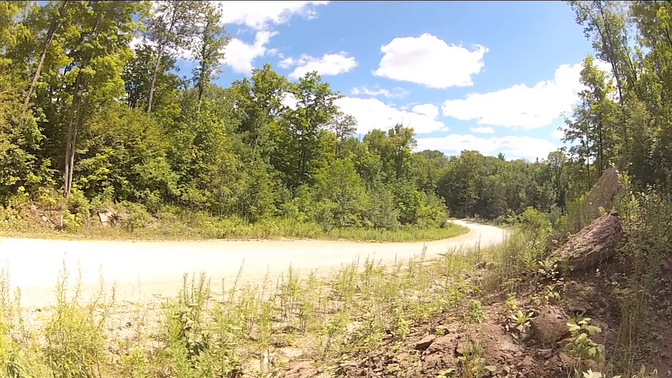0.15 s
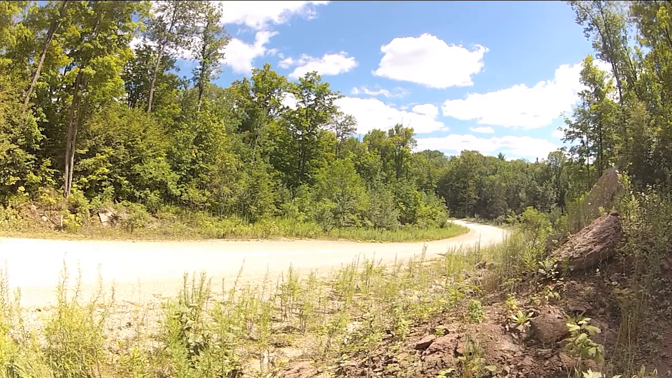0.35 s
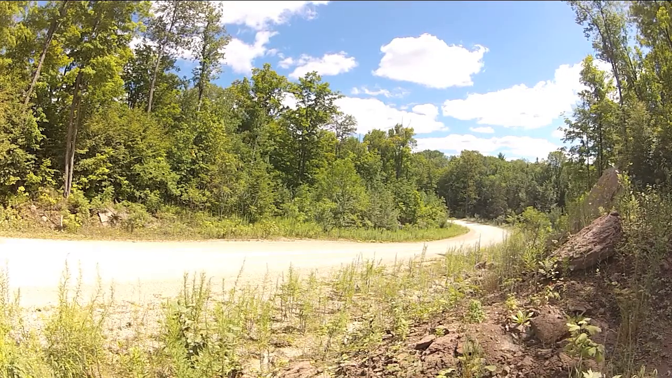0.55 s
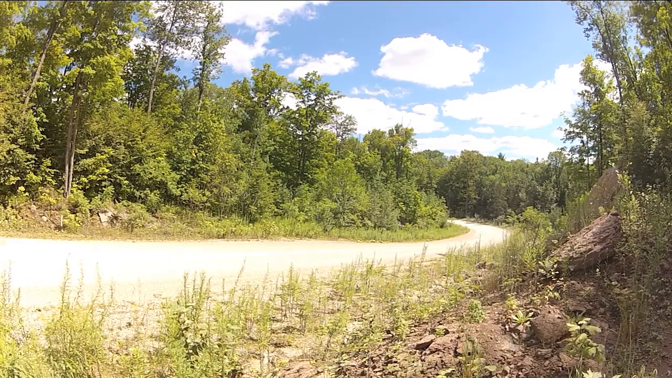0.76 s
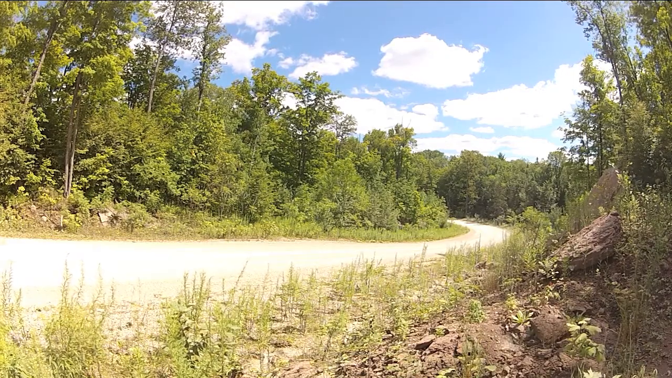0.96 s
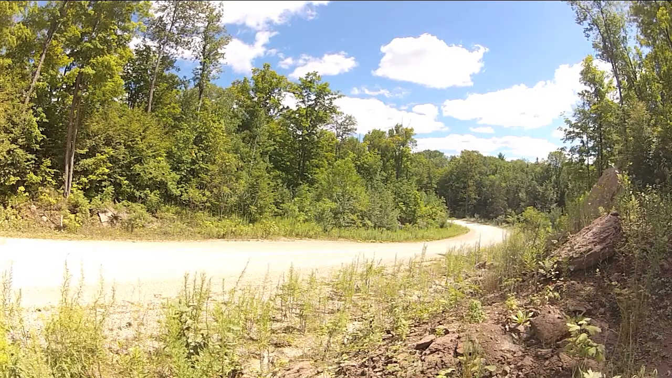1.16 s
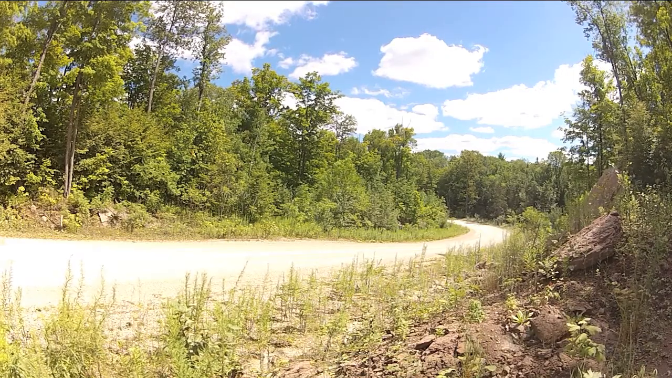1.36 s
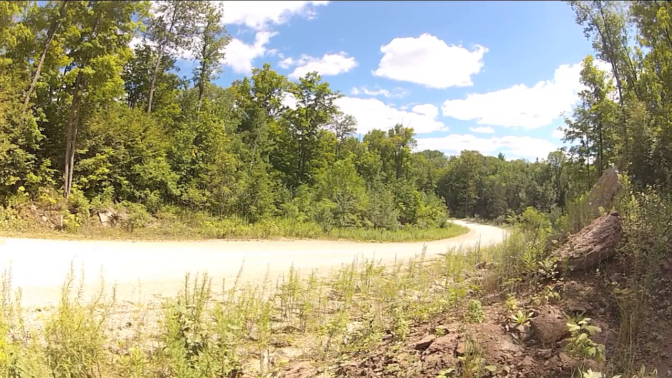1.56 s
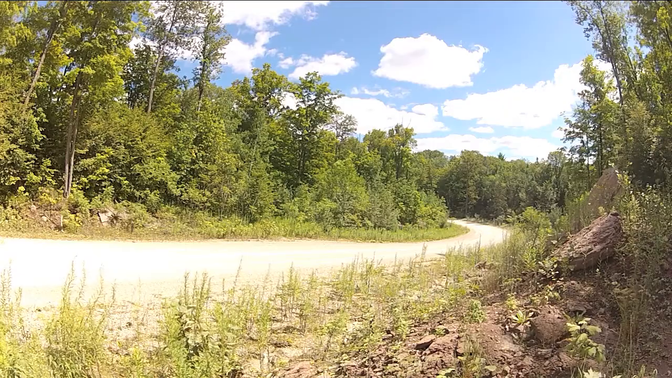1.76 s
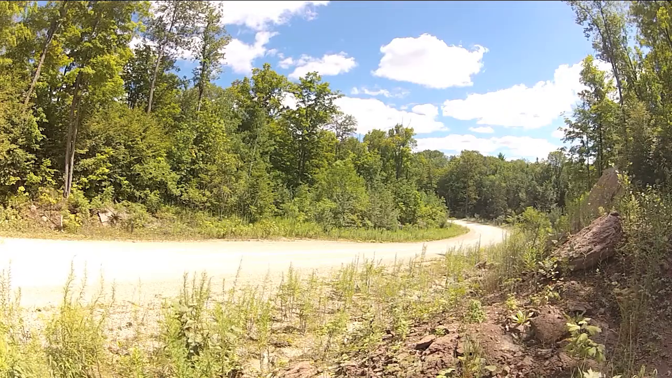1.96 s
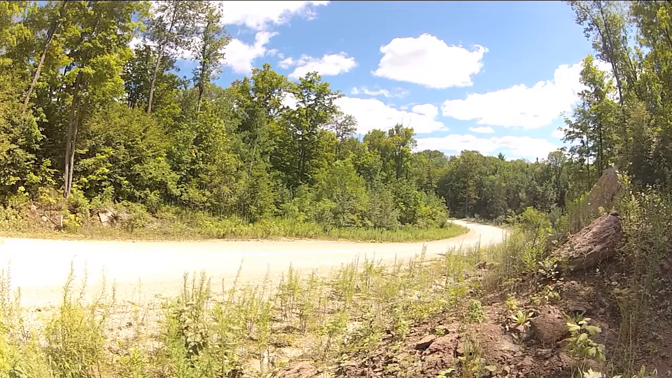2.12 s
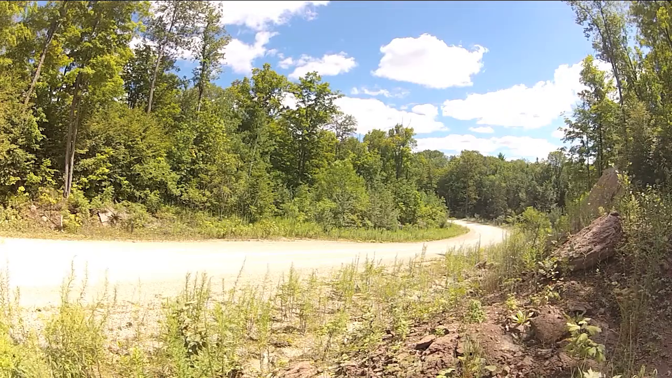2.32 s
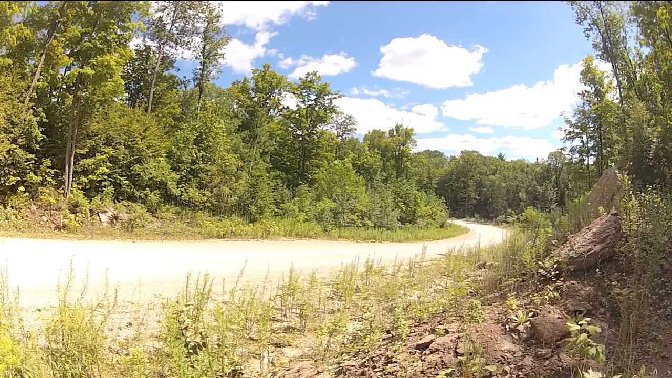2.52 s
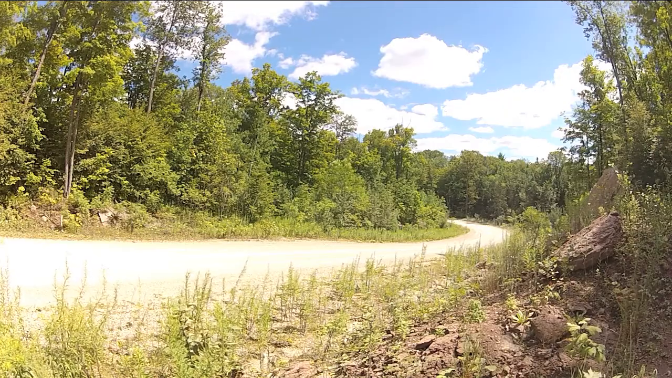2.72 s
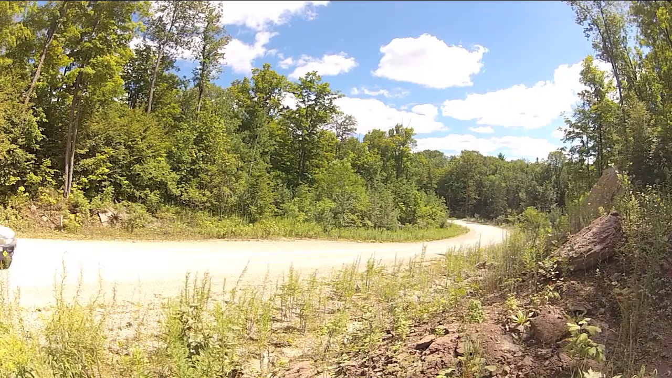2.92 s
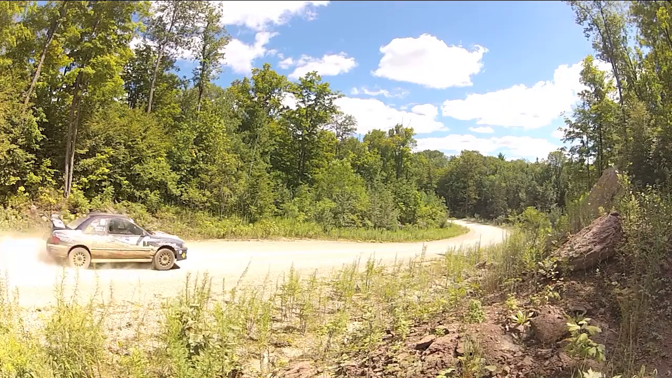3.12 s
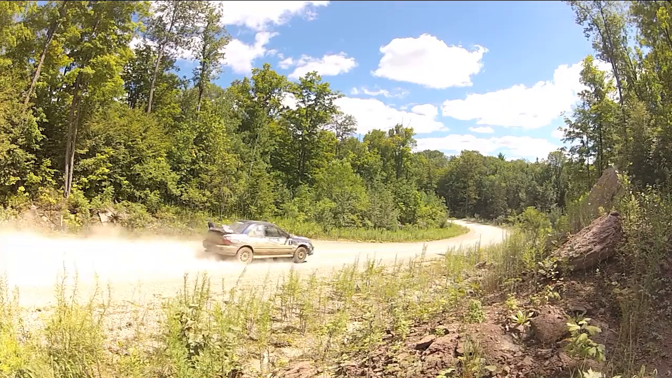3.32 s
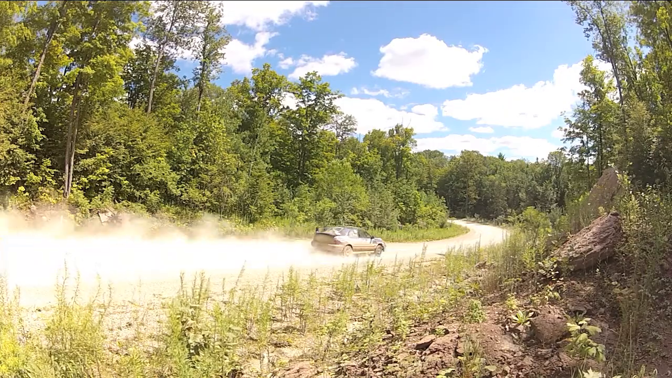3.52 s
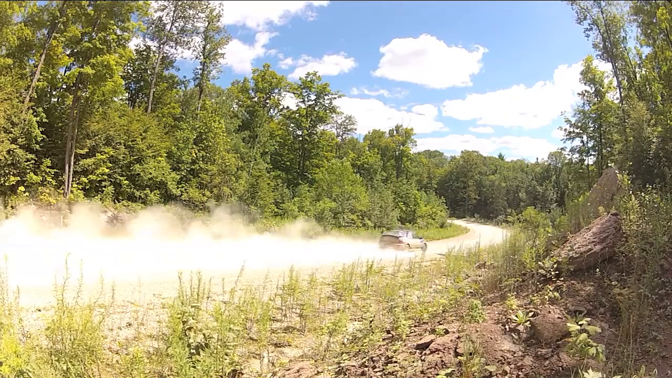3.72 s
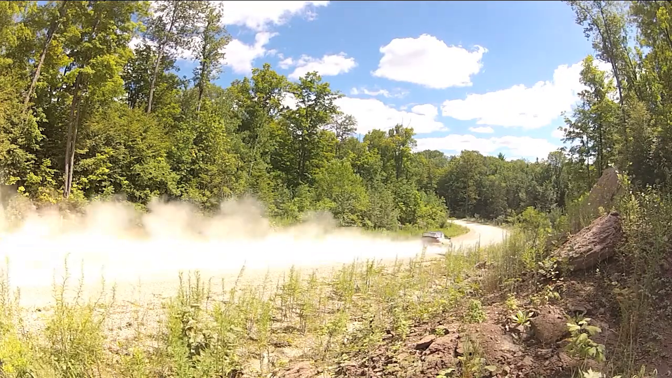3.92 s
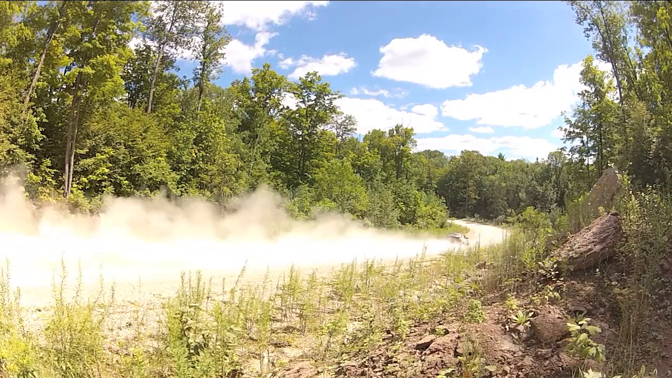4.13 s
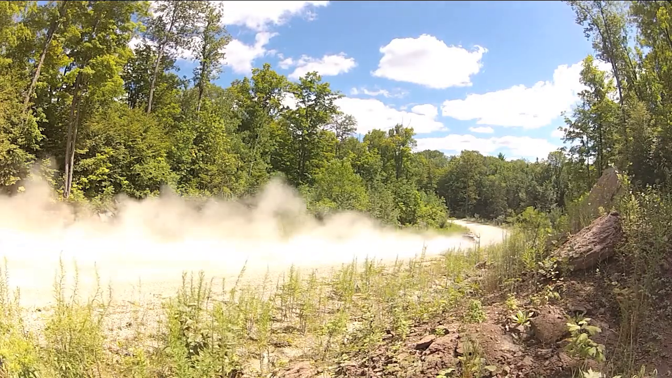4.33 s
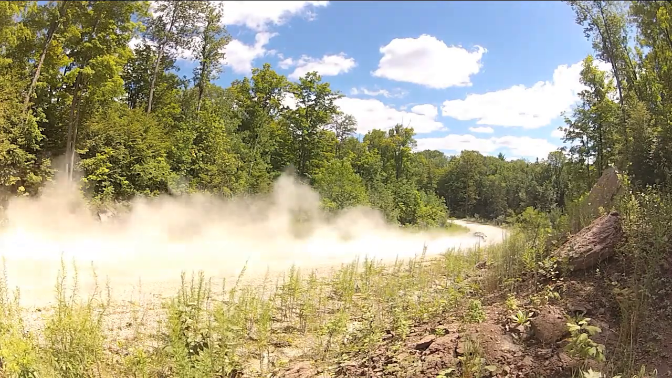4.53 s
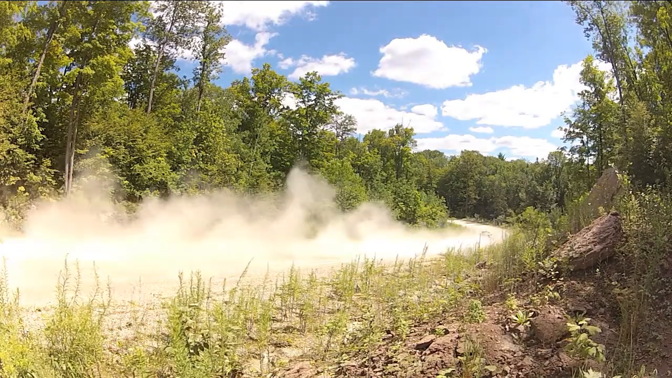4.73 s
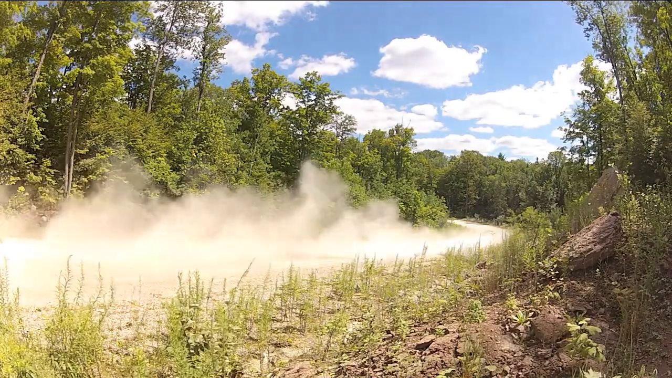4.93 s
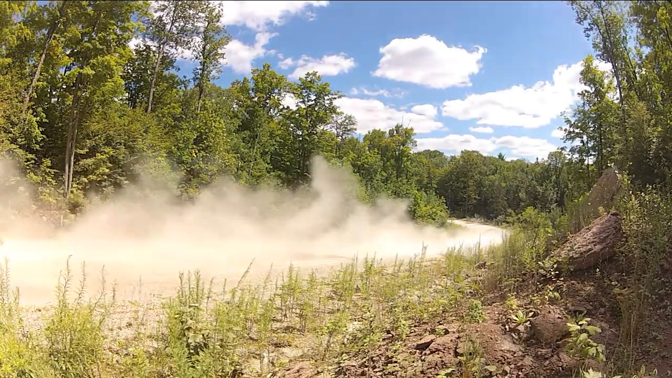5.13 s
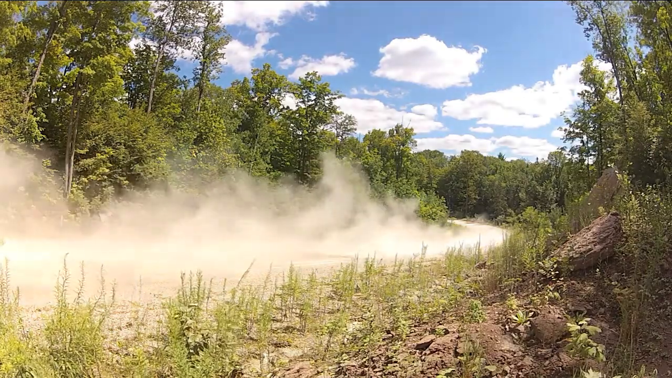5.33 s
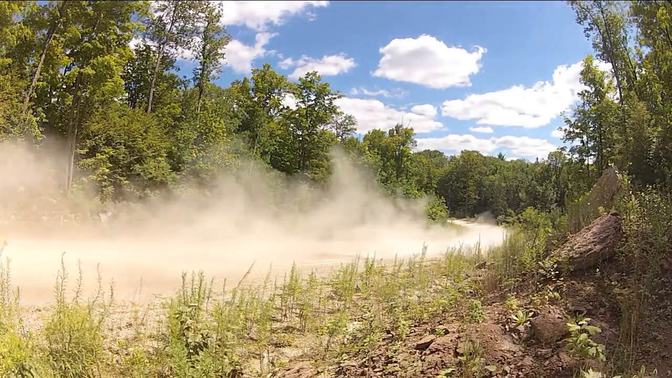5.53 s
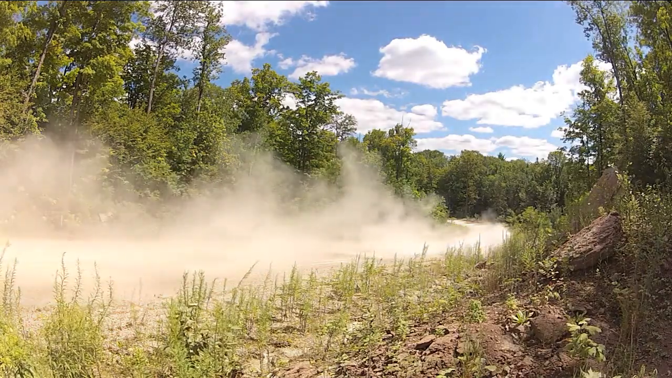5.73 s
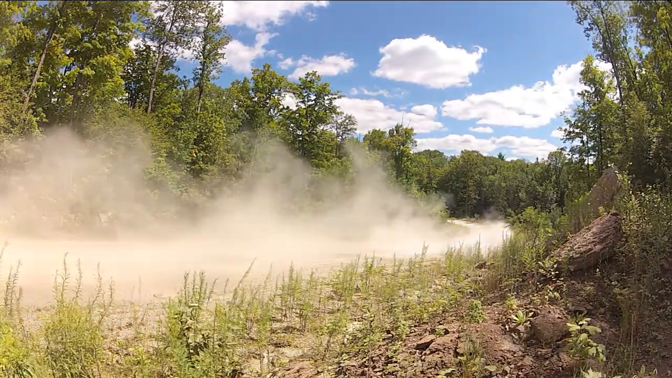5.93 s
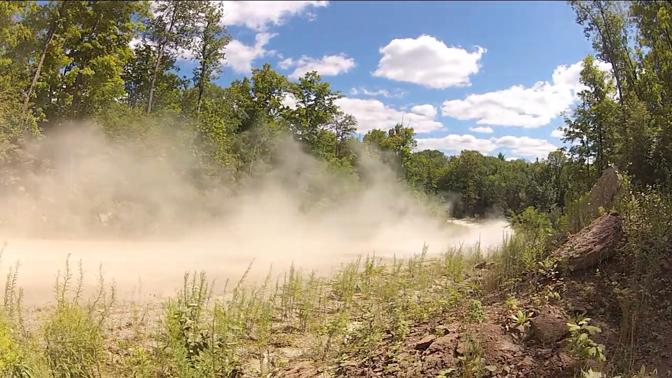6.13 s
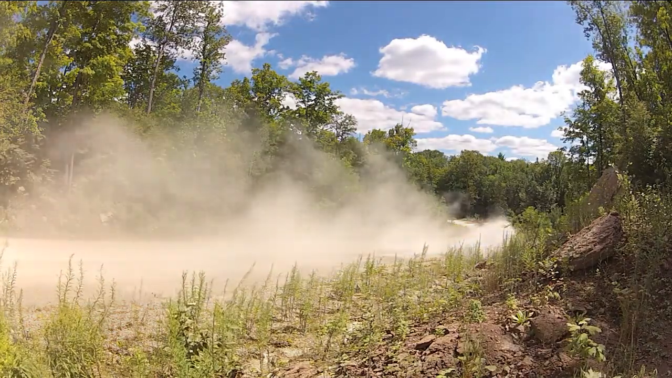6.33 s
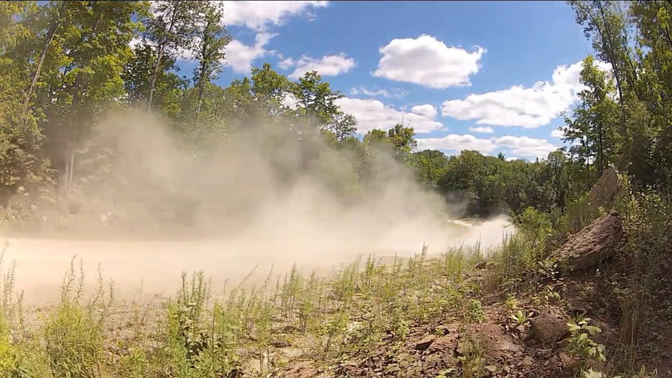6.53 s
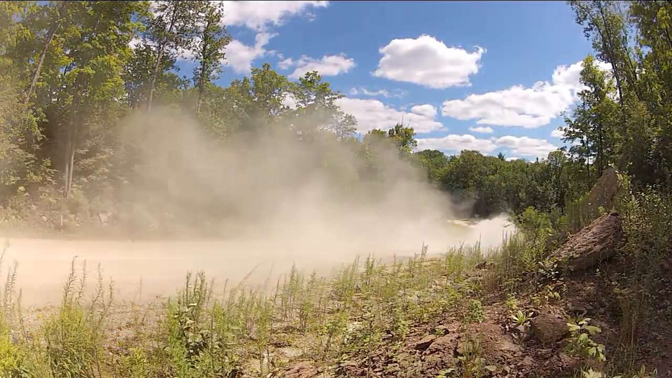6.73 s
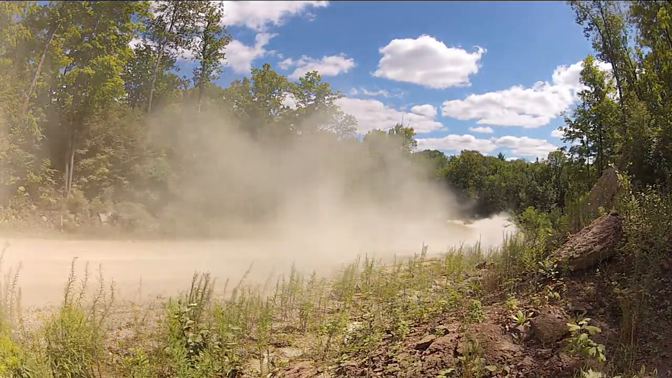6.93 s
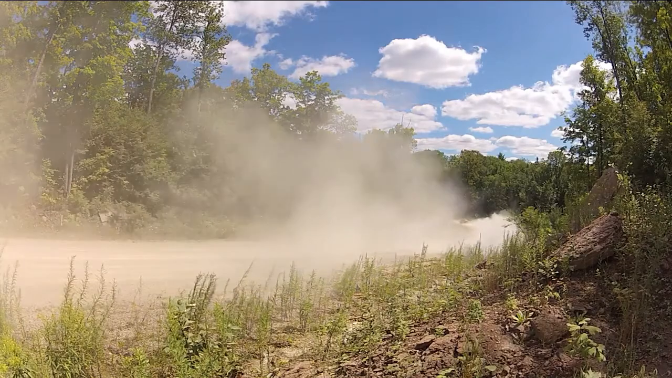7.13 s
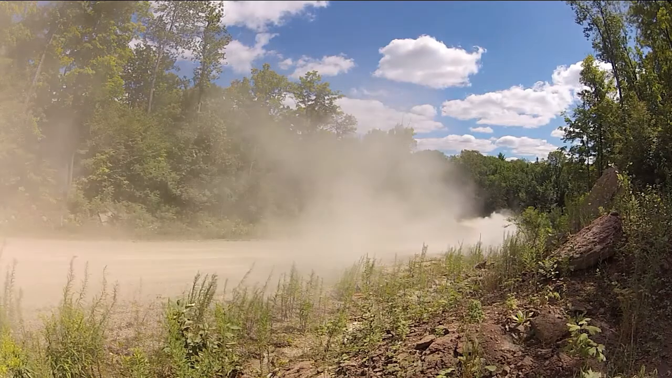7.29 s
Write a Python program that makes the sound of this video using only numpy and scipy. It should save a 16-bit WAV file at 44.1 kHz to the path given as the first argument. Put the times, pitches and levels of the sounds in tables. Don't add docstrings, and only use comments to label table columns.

```python
import sys
import numpy as np
from scipy import signal
from scipy.io import wavfile
from scipy.ndimage import uniform_filter1d

SR = 44100
rng = np.random.default_rng(int(sys.argv[2]) if len(sys.argv) > 2 else 0)


def wav_record(signal):
    frames = np.transpose(np.atleast_2d(signal))
    bounded = np.clip(frames, -1, 1)
    quanta = np.round(bounded * 32767).astype(np.int16)
    wavfile.write(sys.argv[1], SR, quanta)


def volts_from_decibels(level):
    exponent = np.asarray(level, float) / 20
    return 10 ** exponent


N = 328981
SECONDS = np.arange(N) / SR
NEAREST_S, SPEED = 3.05, 28


def evened(x):
    return x / np.sqrt(np.mean(abs(x) ** 2) + 1e-20)


def read(points, hz):
    pitch_hz, value = np.transpose(points)
    return np.interp(np.log(hz + 1), np.log(pitch_hz + 1), value)


def curves(rows):
    start_s, *columns = np.transpose(rows)
    return [np.interp(SECONDS, start_s, column) for column in columns]


def fade(s, half):
    return .5 + .5 * np.tanh((SECONDS - s) / half)


def bump(s, half):
    return np.exp(-((SECONDS - s) / half) ** 2)


def coloured(x, points):
    hz = abs(np.fft.fftfreq(4096, 1 / SR))
    level_db = read(points, hz) - 60 * (hz > 6000)
    log_gain = np.log(volts_from_decibels(level_db))
    taps = np.fft.ifft(np.exp(np.conj(signal.hilbert(log_gain)))).real[:2048]
    return signal.oaconvolve(x, taps)[:N]


def wander(rate_hz, count):
    steps = rng.standard_normal((800, count, 2)) @ [1, 1j] / np.sqrt(2)
    at = SECONDS * 2 * rate_hz
    step = at.astype(int)
    ease = (.5 - .5 * np.cos(np.pi * (at % 1)))[:, None]
    return (steps[step] * (1 - ease) + steps[step + 1] * ease).T


def wash(points, patchy_db, flicker_db):
    frames, hz = N // 128 + 5, np.fft.rfftfreq(512, 1 / SR)
    a, b, patches = rng.standard_normal((frames, 257, 3)).T
    patches = uniform_filter1d(patches, size=5, axis=0)
    patches = evened(uniform_filter1d(patches, size=20, axis=1))
    flicker = evened(uniform_filter1d(rng.standard_normal(frames), size=3))
    level_db = read(points, hz)[:, None] + patchy_db * patches + flicker_db * flicker
    z = (a + 1j * b) * volts_from_decibels(level_db) * (hz < 4400)[:, None]
    return evened(signal.istft(z, nperseg=512, noverlap=384)[1][:N])


def metres():
    return np.hypot(8, SPEED * (SECONDS - NEAREST_S))


def farness():
    return np.clip((metres() - 28) / 30, 0, 1)


# (open_s, shut_s, share 0-1, closing_time_s)
THROTTLE = [
    (-1, 3.758, 1, .006),
    (3.85, 4.3, .3, .12),
    (5.9, 6.225, 1, .022),
]


def pedal():
    return np.array([share * fade(on, .018) * (1 - fade(off, closing))
                     for on, off, share, closing in THROTTLE])


# (start_s, cycle_rate_hz)
ROAD_REVS = [(0, 53.6), (.72, 53.2), (1.0, 48), (1.3, 49.2), (1.58, 53.0), (2.32, 55.3), (2.48, 57.1),
             (3.07, 57.4), (3.82, 56.5), (3.98, 58.9), (4.3, 56), (4.61, 49.7), (5.15, 42.8), (5.46, 43.4),
             (5.68, 46.5), (6.56, 45.3), (6.85, 42.6), (7.46, 40.8)]
# (middle_s, ratio_to_gear_before, half_length_s)
UPSHIFTS = [
    (1.2, .84, .04),
    (3.775, .935, .015),
]
# (start_s, firing_note_db, rasp_db)
EXHAUST = [(0, -37, -46.5), (.3, -45, -47.5), (.62, -54.5, -51.5), (1.1, -45.5, -48.5), (1.28, -37, -49),
           (1.5, -26, -40.5), (1.65, -22.5, -36.5), (1.9, -21.5, -33), (2.3, -25, -25),
           (2.55, -19.5, -21.5), (2.95, -15, -21.5), (3.15, -22, -19), (3.85, -25, -26.5),
           (4.4, -31.5, -39.5), (5.1, -28, -33.5), (5.6, -31, -37), (6.56, -33, -39), (7.46, -43.5, -51)]
# (level_db at rasp -21, share_of_rasp_change, off_throttle_loss_db, rear_view_db, once_gone_db)
LAYERS = [
    (-22.5, 0.93, 8.5, 0.5, -0.5),
    (-22, 0.98, 23, 2, 4.5),
    (-26.5, 0.74, 18, 4, -2),
    (-29, .7, 7, 1, -3),
    (-23, 1.54, 43, 2, 9.5),
    (-34.5, 1.84, 7, 14, -13),
]
# (middle_s, half_length_s, level_db)
NOTE_SWELLS = [
    [(1.31, .03, -6), (1.462, 0.011, -16), (1.746, 0.023, -8), (1.962, 0.011, -8), (3.77, 0.0089, -29),
     (4.467, 0.018, -2), (5.19, 0.02, -10), (6.317, 0.064, -12)],
    [(1.6, 0.032, -8), (1.76, 0.023, -10), (2.45, 0.26, -9.5), (2.68, 0.016, -8), (2.93, 0.037, -6),
     (3.4, .15, -2), (4.43, 0.16, 4), (6.33, .08, -18)],
    [(1.5, 0.066, -7), (1.7, 0.039, -14), (3.07, 0.064, -27), (3.97, .04, -12), (4.14, 0.088, 5),
     (6.07, .25, -18)],
    [(1.85, 0.14, -33), (2.37, 0.14, -32), (2.95, 0.25, -7.5), (3.26, 0.12, -7), (4.3, 0.47, -4.5),
     (4.7, 0.092, 7), (5.35, 0.24, 5.5), (6.07, 0.13, -11)],
]
# (start_s, end_s, fade_s, level_db)
BURBLE = (4.15, 4.8, .2, 13)
# (middle_s, half_length_s, level_db)
TAILPIPE_BEAM = (3.5, .33, 9)


def controls():
    openings = pedal()
    lifted = 1 - np.clip(openings.sum(0), 0, 1)
    gear = np.prod([1 + (ratio - 1) * fade(s, half) for s, ratio, half in UPSHIFTS], axis=0)
    flywheel_s, blip_hz, blip_note_db = 0.0676, 2.8, 8
    keep = np.exp(-1 / (flywheel_s * SR))
    spun = signal.lfilter([1 - keep], [1, -keep], openings[-1])
    cycle_hz = curves(ROAD_REVS)[0] * gear + blip_hz * spun

    dips_db = [sum(db * bump(s, half) for s, half, db in rows) for rows in NOTE_SWELLS]
    note_db, rasp_db = curves(EXHAUST)
    note_db = note_db + blip_note_db * np.maximum(openings[-1], spun) + dips_db[0]
    tail_on = SPEED * (SECONDS - NEAREST_S) / metres()
    gone = farness() * (SECONDS > NEAREST_S)
    layers_db = [db + share * (rasp_db + 21) - lift_db * lifted + rear_db * tail_on + gone_db * gone
                 for db, share, lift_db, rear_db, gone_db in LAYERS]
    layers_db[:3] = np.add(layers_db[:3], dips_db[1:])
    start, end, ease, burble_db = BURBLE
    layers_db[3] = layers_db[3] + burble_db * fade(start, ease / 2) * (1 - fade(end, ease))
    middle, half, beam_db = TAILPIPE_BEAM
    layers_db[5] = layers_db[5] + beam_db * bump(middle, half)

    hidden = np.clip((NEAREST_S - SECONDS) / 2.3, 0, 1)
    scatter = .04 + .5 * hidden + .06 * lifted
    return cycle_hz, scatter, note_db, *layers_db


# (pitch_hz, level_db)
PIPE = [(400, -4.5), (800, -3.5), (1000, -7.5), (1300, -15), (1700, -11.5), (2300, -11), (3000, -49),
        (4000, -4)]


def firing_note(firings, firing_hz, scatter, low_db, upper_db):
    paths = np.sqrt(1 - scatter ** 2) + scatter * wander(rate_hz=14., count=5)
    spin = np.exp(1j * (2 * np.pi * firings - 0.43))
    far = farness()
    note, multiple = np.zeros(N), 1
    for k in range(1, 14):
        multiple = multiple * spin
        if k < 4:
            level_db = low_db[k - 1]
        else:
            level_db = upper_db + read(PIPE, k * firing_hz) - 2.5 * far * (k - 4)
        note -= np.sqrt(2) * volts_from_decibels(level_db) * (paths[k % 5] * multiple).real
    return note


# (blow_db, lateness_in_firings, port_crack_db)
CYLINDERS = [
    (2.5, 0, 0),
    (-1, .008, -13),
    (-.7, -.008, -8),
    (-.3, .008, -12),
]


def firing_pulses(firings):
    number = np.arange(2, int(firings[-1]))
    blow_db, late, port_db = np.array(CYLINDERS)[number % 4].T
    chance_db = rng.standard_normal((2000, 2))[number] * [.3, .9]
    even, fired, hot, ports = np.zeros((4, N))
    even[np.searchsorted(firings, number)] = 1
    fired[np.searchsorted(firings, number + late)] = volts_from_decibels(blow_db + chance_db[:, 0])
    hot[np.searchsorted(firings, number + .03)] = (number % 4 == 0) * volts_from_decibels(chance_db[:, 0])
    ports[np.searchsorted(firings, number + .02)] = volts_from_decibels(port_db + chance_db[:, 1])
    return even, fired, hot, ports


# (pitch_hz, level_db)
LUMP = [(30, -14), (50, -6), (95, -8), (145, 3), (230, 0), (300, -7), (430, 0), (620, 2), (800, -8),
        (1200, -30), (2400, -70)]


def uneven_cylinders(even, fired):
    far = farness()
    lumps = evened(coloured(even * fired.sum() / even.sum() - fired, LUMP))
    dulled = evened(coloured(lumps, [(150, 9.5), (300, 10.0), (430, 13.0), (620, -19.5)]))
    return (1 - far) * lumps + far * dulled


# (pitch_hz, level_db)
KNOCK = [(200, -38.5), (400, -8.5), (620, 7), (900, 5.5), (1200, -1.5), (1700, -6.5), (2500, -8.5),
         (4000, -30.5)]
# (pitch_hz, level_db)
FAR_KNOCK = [(250, -15), (450, 12), (650, -8), (950, 3), (1200, -25), (1600, -41), (3000, -72)]
# (delay_s, gain)
TRUNKS = [
    (0, 1),
    (.0061, -.8),
    (.0127, .7),
    (.0178, .6),
    (.0232, -.5),
]


def hot_knock(hot):
    far = farness()
    echoed = sum(gain * np.roll(hot, round(delay * SR)) for delay, gain in TRUNKS)
    near_knock = evened(coloured(-hot, KNOCK))
    far_knock = evened(coloured(-echoed, FAR_KNOCK))
    return np.sqrt(1 - far) * near_knock + np.sqrt(far) * far_knock


# (pitch_hz, level_db)
CRACK = [(300, -27), (1000, -18), (1500, 8.5), (2200, -2), (2900, -3), (3500, 12), (4200, 12)]


def port_crack(ports):
    spit = signal.lfilter([1], [1, -.98], ports) * rng.standard_normal(N)
    jet = .3 * evened(spit) - evened(ports)
    return (1 - farness()) * evened(coloured(jet, CRACK))


# (middle_s, half_length_s, level_db)
STUMBLE = (3.965, 0.04, -27.5)


def stumble(firings):
    middle, half, level_db = STUMBLE
    missing = np.exp(-((SECONDS - middle) / half) ** 4 / 2)
    return -np.sqrt(2) * volts_from_decibels(level_db) * missing * np.cos(2 * np.pi * firings * 3 / 4)


def engine():
    cycle_hz, scatter, *low_db, upper_db, uneven_db, knock_db, crack_db = controls()
    firing_hz = 4 * cycle_hz
    firings = 1.73 + np.cumsum(firing_hz) / SR
    even, fired, hot, ports = firing_pulses(firings)
    note = firing_note(firings, firing_hz, scatter, low_db, upper_db) + stumble(firings)
    growl = volts_from_decibels(uneven_db) * uneven_cylinders(even, fired)
    knock = volts_from_decibels(knock_db) * hot_knock(hot)
    return note + growl + knock + volts_from_decibels(crack_db) * port_crack(ports)


def road(x):
    tail_m = np.hypot(5, SPEED * (SECONDS - 3.29))
    notch_hz = 195. * tail_m
    dull = signal.sosfiltfilt(signal.butter(1, 2090, fs=SR, output="sos"), x)
    return x + .85 * np.interp(SECONDS - .5 / notch_hz, SECONDS, dull)


# (pitch_hz, time_to_fall_60_db_s)
FOREST = [(100, 1), (500, 1), (2000, 0.69), (5000, 0.4)]


def forest(x):
    taps = np.zeros(SR)
    at = np.arange(900, SR - 20, 20)
    taps[at + rng.integers(0, 20, len(at))] = rng.choice([-1., 1.], len(at))
    hz, t, z = signal.stft(taps, SR, nperseg=512)
    decay = volts_from_decibels(-60 * t / read(FOREST, hz)[:, None])
    tail = signal.istft(z * decay, SR, nperseg=512)[1]
    return signal.fftconvolve(x, tail / np.linalg.norm(tail))[:N]


# (start_s, hiss_db)
TYRES = [(0, -40), (.3, -39.5), (.48, -37), (.79, -46), (1.35, -42.5), (1.5, -37.5), (2.0, -32.5),
         (2.2, -28.5), (2.66, -23), (2.95, -25.5), (3.14, -28), (3.45, -25), (3.72, -29), (3.85, -32),
         (4.09, -40), (4.5, -43.5), (5.05, -55.5), (7.46, -58)]
# (pitch_hz, level_db)
HISS = [(410, -32.5), (700, -24), (780, -6), (945, -6), (1070, -10.5), (3230, -14), (4010, -7.5),
        (4400, -10), (5720, -61), (9680, -120)]
# (pitch_hz, level_db)
ROAR = [(30, -11), (60, -13.5), (110, 17), (250, -0.5), (450, 2.5), (800, 0), (1100, -7.5), (1500, -18.5),
        (2500, -17)]


def tyres():
    stones_per_s, stones_db, roar_db, spray_db = 1500, -9.0, 6.5, 4.5
    hiss_db = curves(TYRES)[0] + spray_db * pedal()[-1]
    sizes = volts_from_decibels(5.0 * np.minimum(rng.exponential(1, N), 4)) * rng.standard_normal(N)
    stones = evened(coloured((rng.random(N) < stones_per_s / SR) * sizes, HISS))
    hiss = wash(HISS, patchy_db=1.5, flicker_db=.8)
    grit = evened(hiss + volts_from_decibels(stones_db) * stones)
    behind = farness() * (np.arange(N) > NEAREST_S * SR)
    dulled = coloured(grit, [(1400, 7.0), (2100, 4.5), (3200, -14.0)])
    grit = (1 - behind) * grit + behind * dulled
    over_db = -2 - .23 * (hiss_db + 32.5) + 9 * behind
    roar = wash(ROAR, patchy_db=1.8, flicker_db=.9)
    lowered_db = -6 * np.exp(-((SECONDS - 3.45) / .4) ** 4) - 2 * behind
    roar = roar * volts_from_decibels(lowered_db)
    grit = grit * volts_from_decibels(lowered_db / 3)
    return volts_from_decibels(hiss_db) * (grit + volts_from_decibels(over_db + roar_db) * roar)


# (pitch_hz, width_hz, level_db)
HUM = (71.3, 2.5, -44)
# (pitch_hz, level_db)
AIR = [(20, -49), (45, 19), (120, -2), (400, -4.5), (1000, -30.5), (4000, -41)]


def still():
    hz, width, level_db = HUM
    r = np.exp(-np.pi * width / SR)
    resonance = [1, -2 * r * np.cos(2 * np.pi * hz / SR), r * r]
    drone = signal.lfilter([1], resonance, rng.standard_normal(N))
    air = wash(AIR, patchy_db=1.8, flicker_db=.6)
    return volts_from_decibels(level_db) * evened(drone) + volts_from_decibels(-41.5) * air


# (start_s, peak_db)
POPS = [
    (4.12, -22),
    (4.141, -21),
    (4.1637, -29),
]


def pops():
    clicks = np.zeros(N)
    for start, peak_db in POPS:
        clicks[round(start * SR)] = -volts_from_decibels(peak_db)
    snap = [(300, -18), (900, -2), (2000, 0), (3600, -3)]  # (pitch_hz, level_db)
    shape = coloured(np.eye(1, N)[0], snap)
    return volts_from_decibels(5.5) * coloured(clicks, snap) / abs(shape).max()


def scene():
    car = road(engine()) + pops()
    echoes = volts_from_decibels(-19) * forest(car)
    return (car + echoes + tyres() + still())[None]


def top_cut(x):
    return signal.sosfilt(signal.butter(12, 15940, fs=SR, output="sos"), x)


def record(dry):
    mic = signal.sosfilt(signal.butter(2, 40., "highpass", fs=SR, output="sos"), dry)
    guard = signal.firwin(101, 3750., window=("kaiser", 5), fs=SR)
    guarded = signal.oaconvolve(mic, guard[None], "same")
    coarse = signal.resample_poly(guarded, 80, 441, axis=1, window=("kaiser", 8))
    coarse = coarse / (1 + abs(coarse / .87) ** 6) ** (1 / 6)
    repeated = np.repeat(coarse, 4, axis=1)
    held = signal.resample_poly(repeated, 441, 320, axis=1)
    held = np.pad(held, ((0, 0), (0, 16)))[:, :N]
    edge_hz = 15280
    corners_hz = [0, 13600, 14600, edge_hz, edge_hz + 60, SR / 2]
    treble_cut = signal.firwin2(1023, corners_hz, [1, 1, .55, .24, 0, 0], fs=SR)
    limited = signal.oaconvolve(held, treble_cut[None], "same")
    return top_cut(limited)


dry = scene()
out = record(dry)
wav_record(out)
```